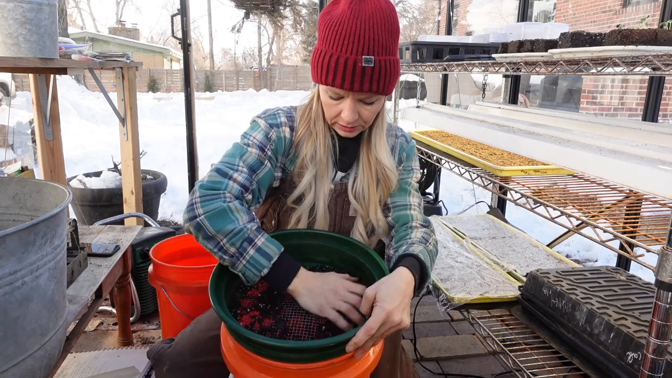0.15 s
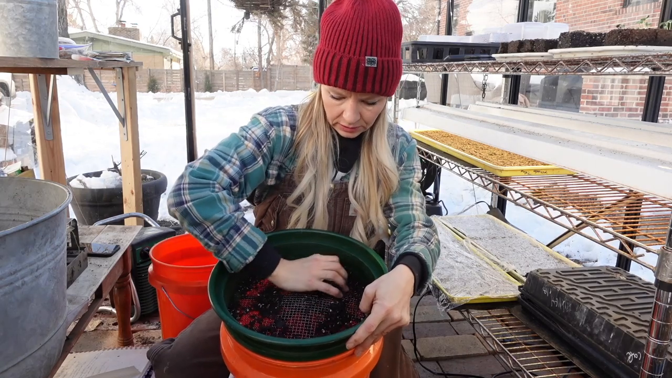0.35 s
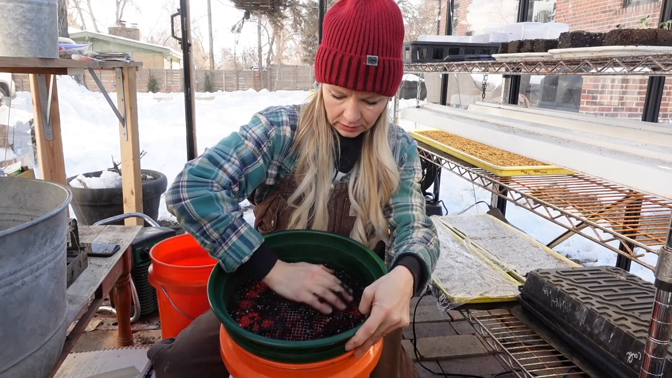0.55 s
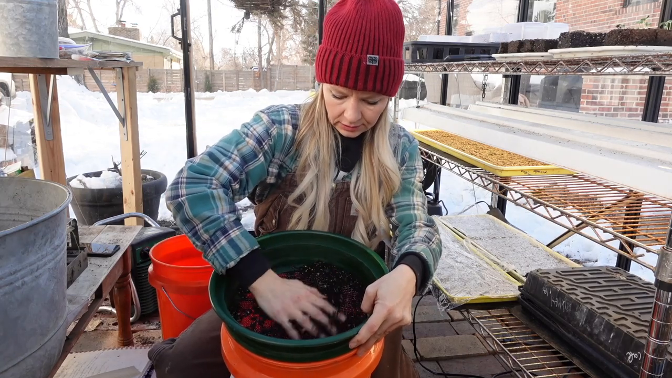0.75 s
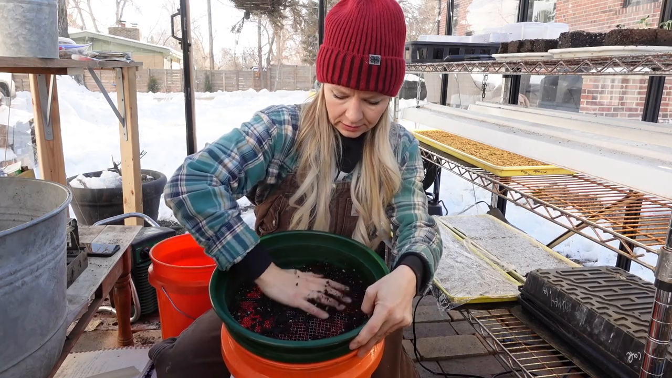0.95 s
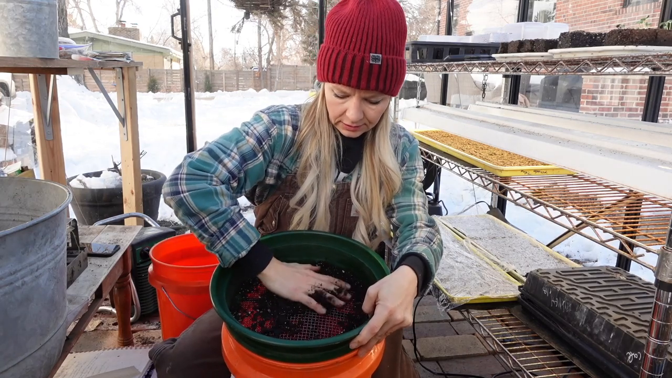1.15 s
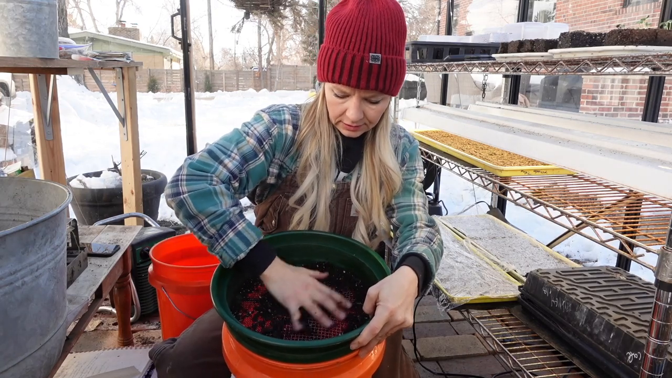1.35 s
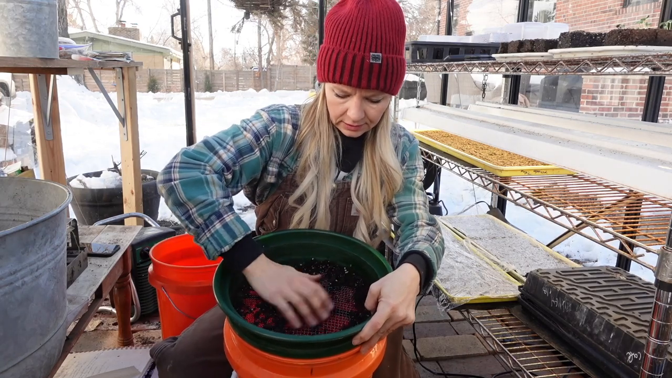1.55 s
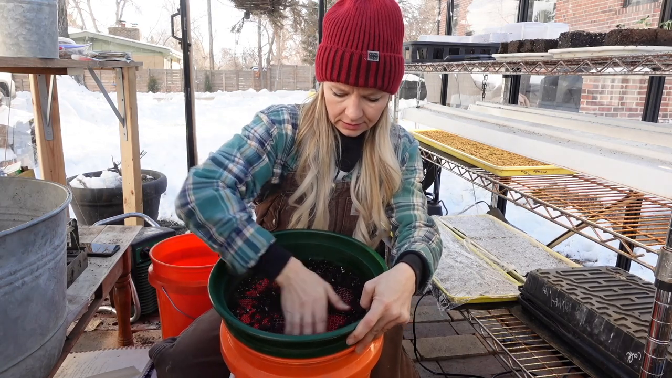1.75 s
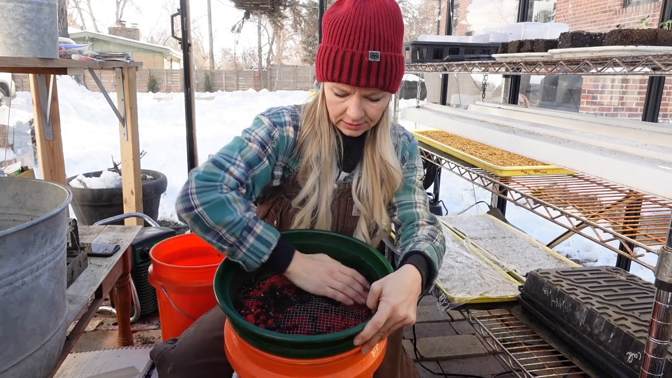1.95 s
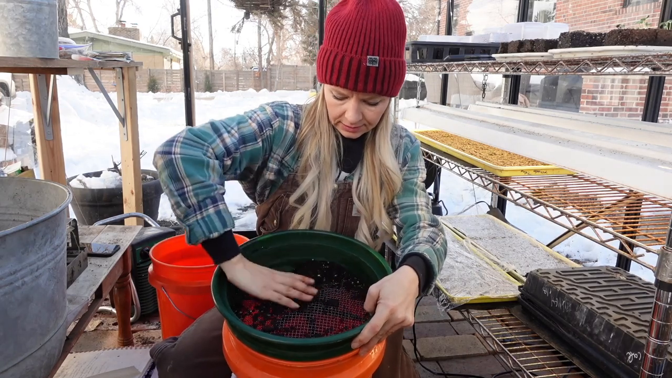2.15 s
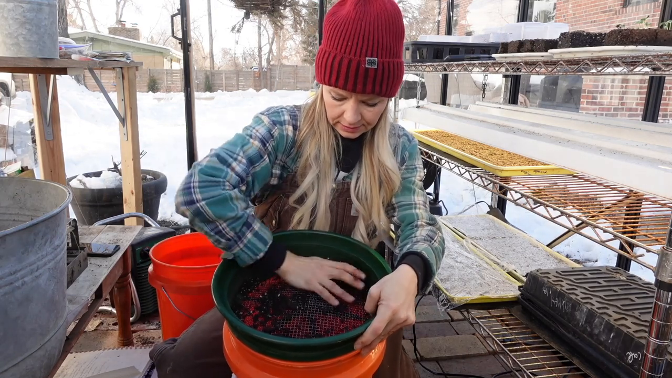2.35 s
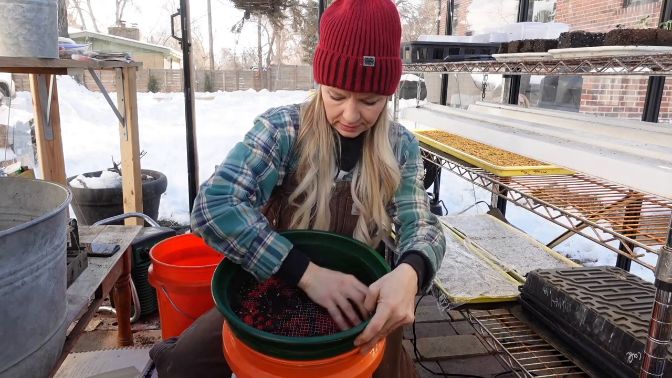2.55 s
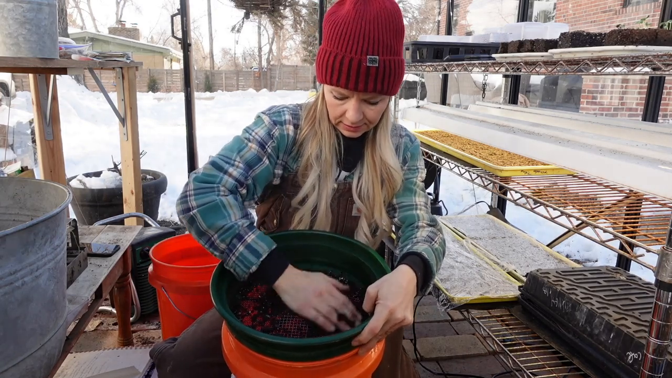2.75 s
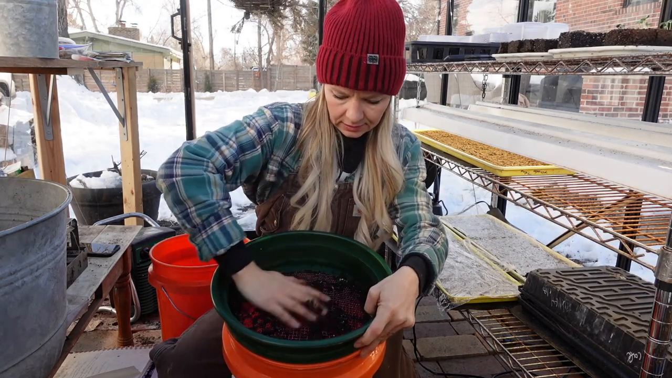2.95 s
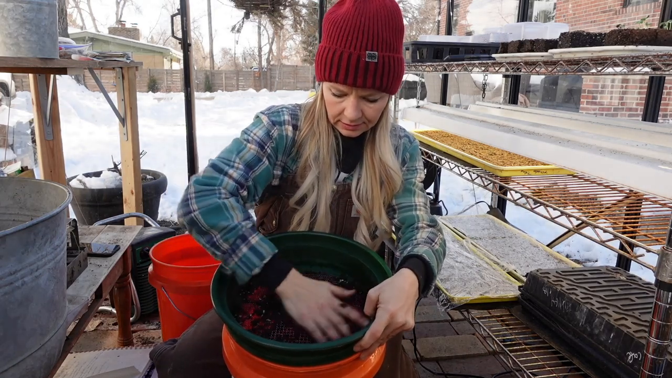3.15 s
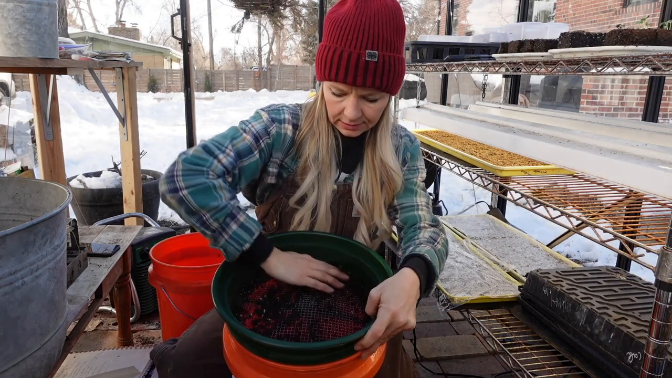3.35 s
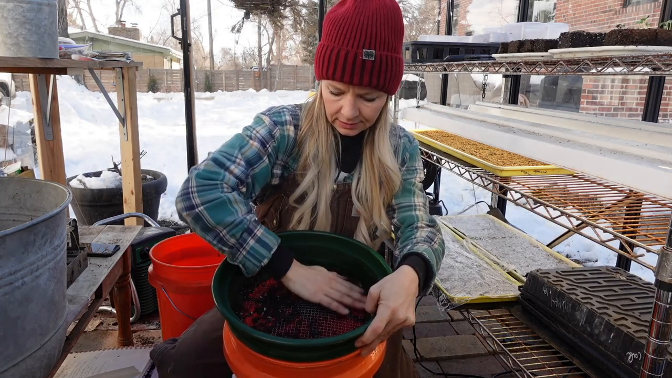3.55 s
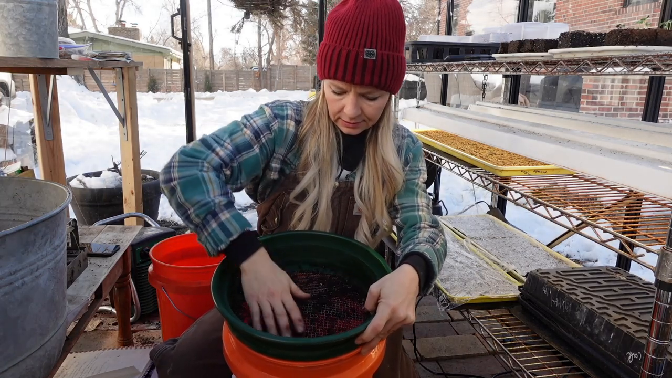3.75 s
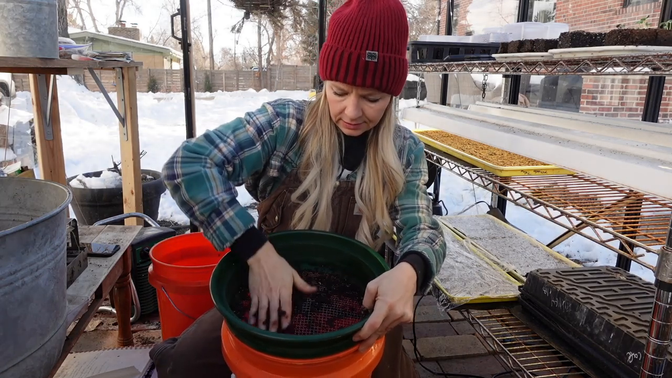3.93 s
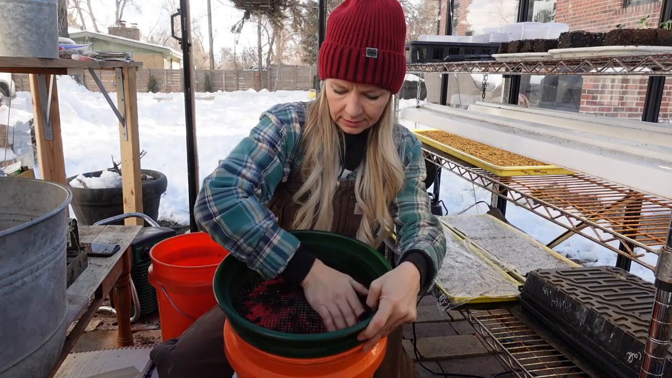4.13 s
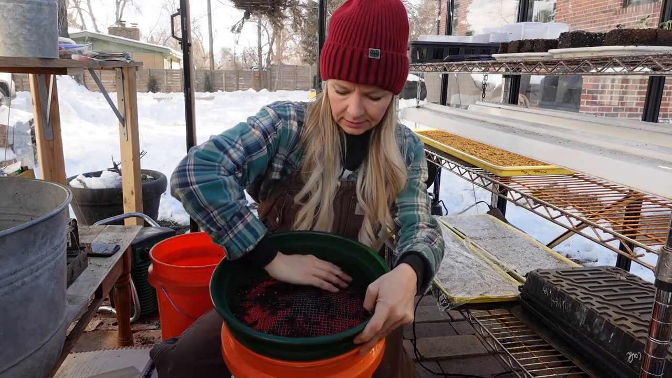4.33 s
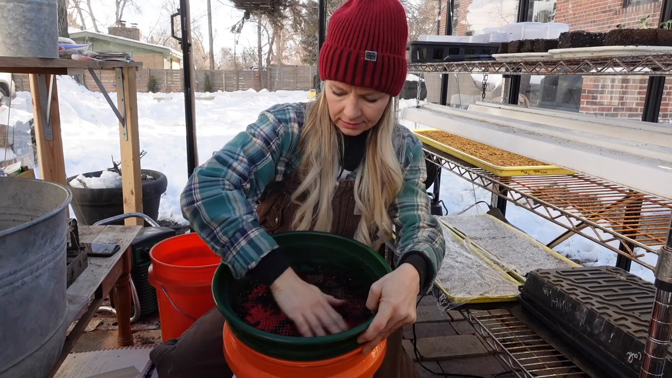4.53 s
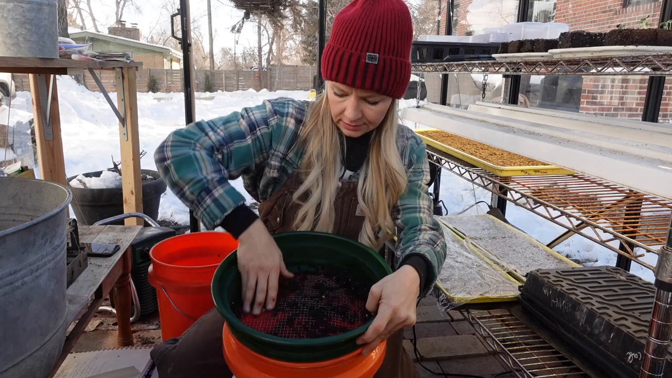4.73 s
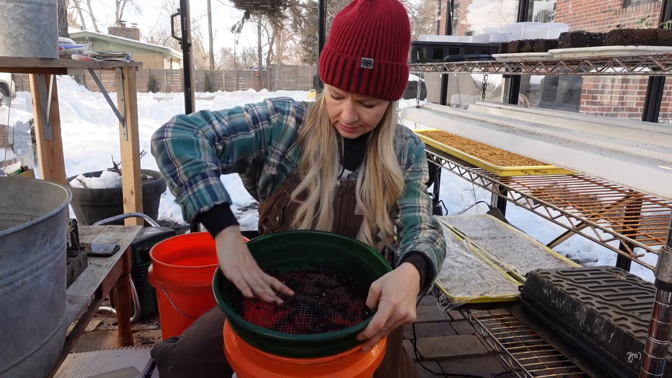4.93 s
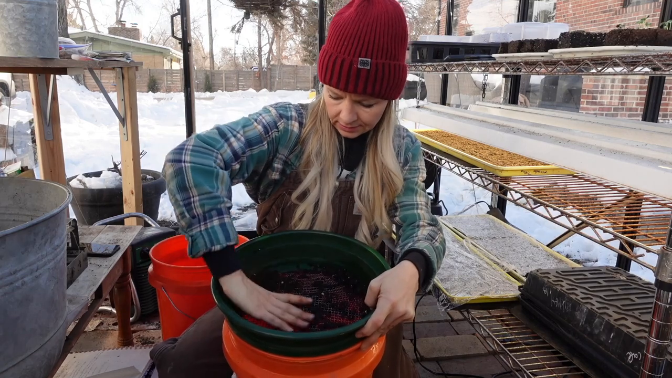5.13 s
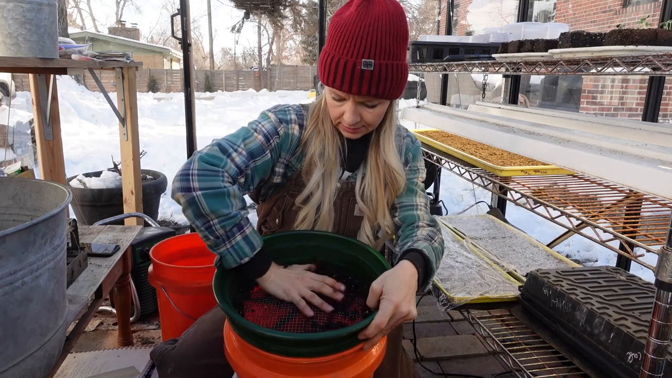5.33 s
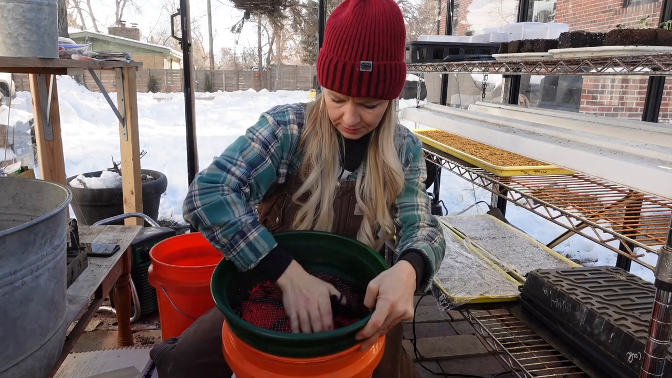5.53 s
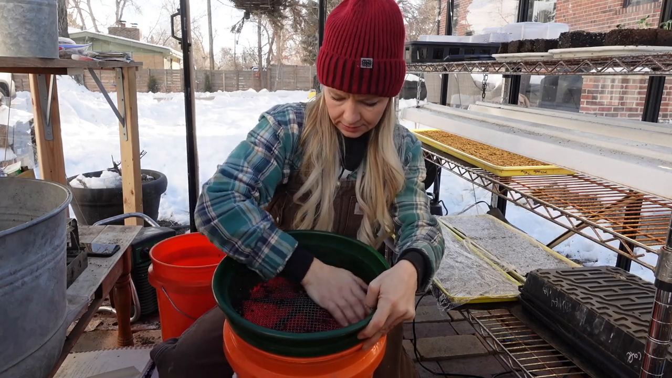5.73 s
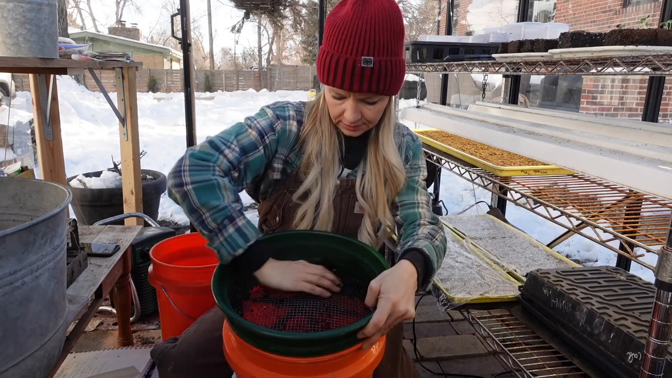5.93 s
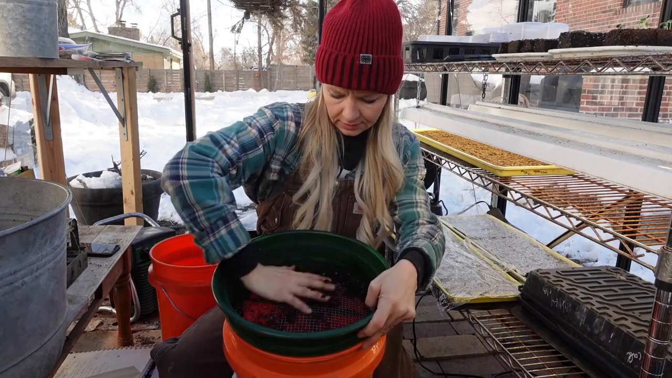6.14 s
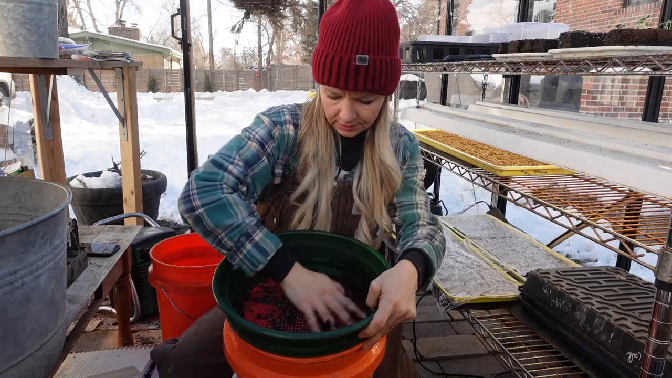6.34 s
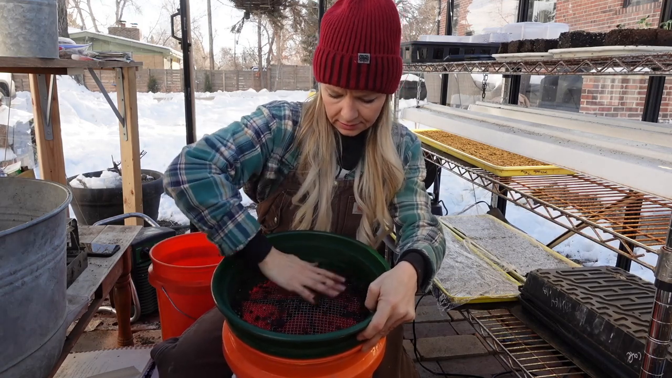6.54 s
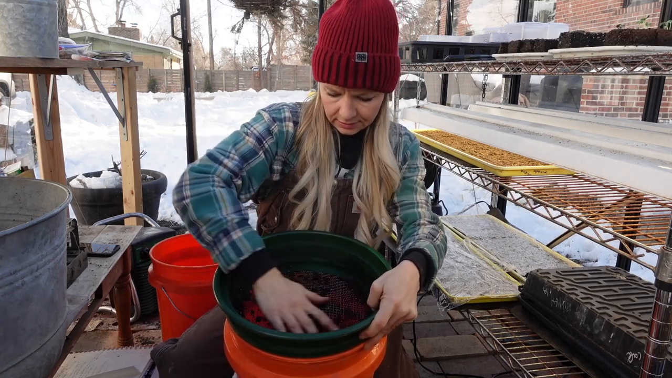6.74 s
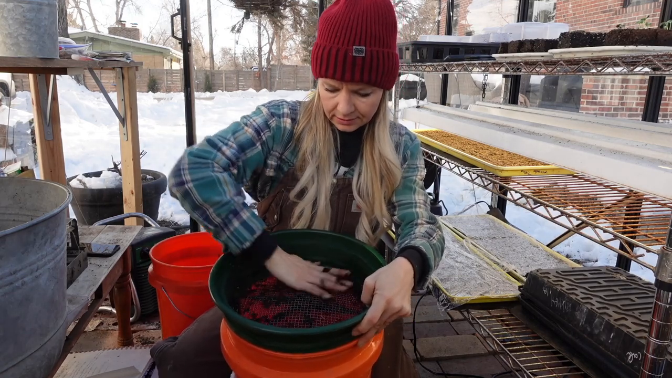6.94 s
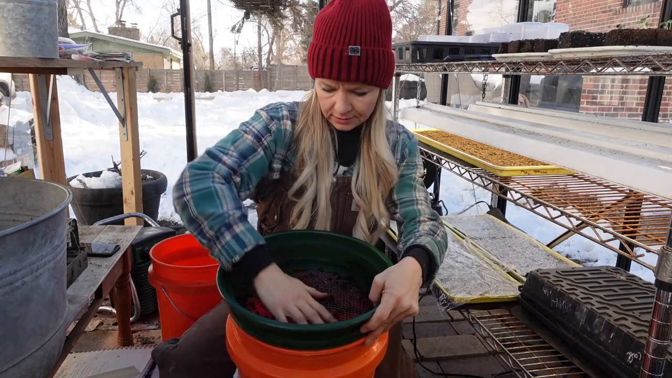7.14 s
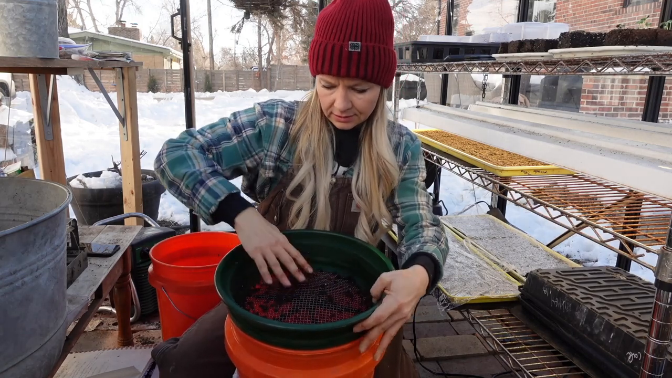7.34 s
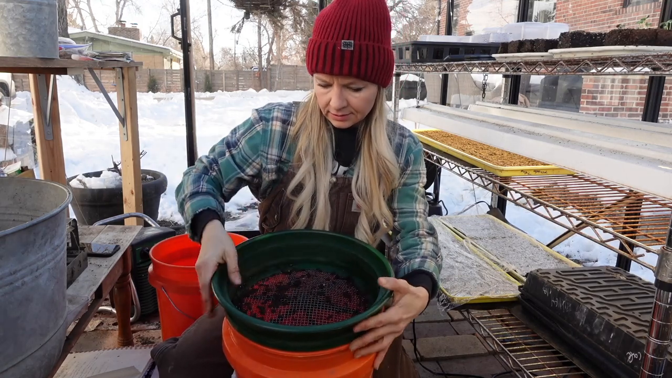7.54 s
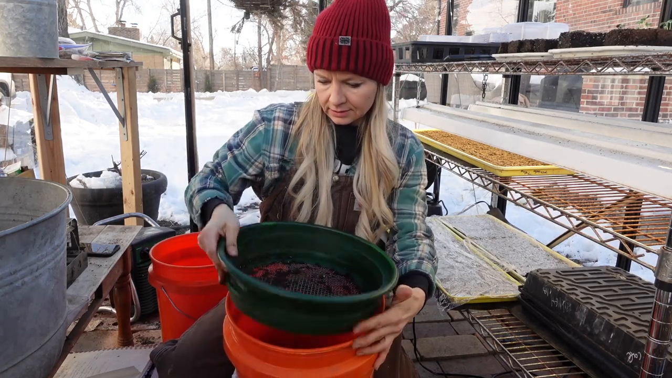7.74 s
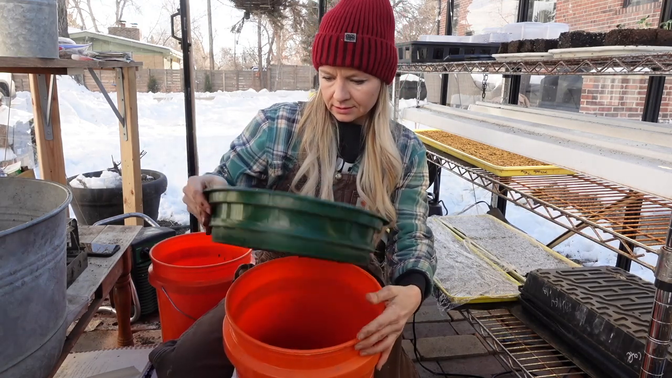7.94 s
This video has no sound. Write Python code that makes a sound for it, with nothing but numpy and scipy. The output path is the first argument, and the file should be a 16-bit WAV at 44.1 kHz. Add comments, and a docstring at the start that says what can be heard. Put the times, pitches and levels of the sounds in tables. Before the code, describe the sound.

A close, dry outdoor sound of potting soil rubbed by hand through a wire-mesh sieve on a plastic bucket. From 0 s, gritty overlapping strokes come about four to seven a second, soft at first and stronger from 0.7 to 1.3 s. Each swells quickly and fades, scratching and ringing the mesh around 1 to 2 kHz, with hissing fine grit above and hollow bucket drumming and wall rattle below. Clods knock irregularly, notably near 0.2, 1.0 and 1.5 s, with tiny snaps. After a dip around 1.5 s the rubbing resumes, busy from 2.5 to 4.8 s, thinner near 5 s amid several knocks, then vigorous from 5.9 to 7.2 s. Strokes die away by 7.4 s, leaving sparse grit and a snap at 7.6 s. At 7.7 s the rim slides with a short rough squeak, followed by faint bumps. Low hum and soft outdoor rumble continue underneath.

```python
"""Gritty, scratching hand strokes: potting soil is rubbed through a wire-mesh sieve on a plastic bucket.
Random grain clicks, swelling with each sweep, scratch and ring the sieve and drum the bucket and its air.
Decaying noise bursts make clods knock and crack; bare clicks snap, and a short friction squeak comes late.
A short diffuse tail surrounds it; below lie a low hum and a faint outdoor rumble, both of filtered noise."""
import sys
import numpy as np
from scipy import signal
from scipy.fft import rfft, irfft
from scipy.io import wavfile

SR = 44100
rng = np.random.default_rng(int(sys.argv[2]) if len(sys.argv) > 2 else 0)


def store_wav(level_fs):
    """Save 16-bit WAV to argv[1]."""
    pcm = np.round(np.clip(np.atleast_2d(level_fs), -1, 1) * 32767)
    wavfile.write(sys.argv[1], SR, pcm.T.astype(np.int16))


N = 356372   # samples


def sifting():
    """Strokes and knocks drive the bucket, the sieve and the fine grit."""
    coarse = grains(6000, spread_db=2.5, clump_db=-0.9, clump_rate=34)
    coarse = coarse * crumbs(80, level_db=-11, t60=0.028)
    return bucket(coarse) + sieve(coarse) + grit()


# Sweeps of the hand over the mesh; levels before each layer's gain:
# start_s, length_s, peak_level_db, air_drumming_db, wall_rattle_db, fine_grit_db (last three re peak)
HAND_SWEEPS = [(-0.052, 0.2, -32.0, -4, -14, -2.5), (0.044, 0.47, -30.5, -12, -11, -2),
               (0.18, 0.44, -34, -11, -10, -1), (0.385, 0.27, -28, -14, -6.5, 1),
               (0.55, 0.23, -29, -7.5, -7.5, -2), (0.686, 0.29, -23.5, -19, -8.5, -1.5),
               (0.845, 0.23, -23.5, -12, -9.5, -2), (0.985, 0.23, -24, -13, -9, -1.5),
               (1.123, 0.16, -18.5, -15, -13, -5.5), (1.227, 0.19, -23.5, -6, -10.0, -3),
               (1.341, 0.24, -27, -5, -9, 0), (1.45, 0.28, -37.5, -22.0, -12, -0.5),
               (1.6, 0.36, -44.5, -8, -11, 0), (1.741, 0.41, -27.5, -9.0, -8, -1.5),
               (1.919, 0.25, -28.5, -4, -3, -1.5), (2.0, 0.42, -30.0, -11, -9.5, -2),
               (2.229, 0.31, -28.5, -14.5, -12, -3), (2.327, 0.67, -30.0, -12, -6, -2.5),
               (2.556, 0.29, -22.5, -10, -10, -7), (2.723, 0.37, -24.0, -10.5, -7.5, -2.5),
               (2.918, 0.36, -21.5, -12, -11.0, -5), (3.108, 0.32, -21, -12, -6.5, -5),
               (3.268, 0.29, -28, -7, -7.0, 0.5), (3.428, 0.54, -29.5, -5.5, -9, 1.5),
               (3.594, 0.5, -23, -14, -8.5, -3.5), (3.923, 0.26, -25.5, -17.5, -10.5, -5.0),
               (4.023, 0.34, -25, -7, -8, -4.0), (4.197, 0.29, -24.5, -6.0, -6.5, 0.5),
               (4.404, 0.42, -23.5, -7.5, -3.5, -2), (4.607, 0.38, -23.0, -14.0, -11, -2.5),
               (4.935, 0.5, -44.5, -1.5, -5.5, 3), (5.172, 0.31, -31, -10, -13.0, 0),
               (5.243, 0.51, -27.5, -9.5, -7.5, -2.0), (5.483, 0.32, -27, -10.5, -6.5, -1.5),
               (5.669, 0.39, -24.5, -9, -8.0, -4.0), (5.787, 0.51, -28.5, -13.0, -6.5, 1),
               (5.955, 0.3, -22.5, -16.0, -8.5, -9), (6.122, 0.39, -25, -14.0, -9.5, -4.0),
               (6.298, 0.3, -19.5, -13.5, -8, -9), (6.453, 0.39, -22.5, -14.5, -9.5, -5.5),
               (6.643, 0.31, -21.5, -11.5, -8.5, -1), (6.797, 0.32, -21, -13.0, -13.5, -8),
               (6.906, 0.27, -23, -15, -5.5, -8.5), (7.058, 0.19, -22.5, -18.0, -7.5, -3),
               (7.114, 0.46, -29.5, -16, -10.0, -4), (7.383, 0.33, -47.5, -16.5, -11.0, 7.5),
               (7.535, 0.39, -47, -3.5, -5.5, 4.5), (7.678, 0.37, -41.5, 5, -4, 0),
               (7.792, 0.19, -38.5, -11, -13, 1), (7.913, 0.14, -51.5, 5, -3.0, 7.5)]
# The hand is fastest early in a sweep; sound power grows steeply with its speed.
SPEED_UP, SPEED_POWER = 0.59, 7.3   # time-warp exponent, power exponent


def sweeps(level_db, trickle_db):
    """Gain of a layer: each sweep speeds up, slows and stops; powers add to a steady trickle."""
    power = np.full(N, from_db(2 * trickle_db))
    for (start_s, length_s, *_), db in zip(HAND_SWEEPS, level_db):
        first = max(round(start_s * SR), 0)
        last = min(round((start_s + length_s) * SR), N)
        i = np.arange(first, last)
        progress = np.clip((i / SR - start_s) / length_s, 0, 1)
        speed = np.sin(np.pi * progress ** SPEED_UP)
        power[i] += from_db(2 * db) * np.abs(speed) ** SPEED_POWER
    return np.sqrt(power)


# Clods and stones; levels before each layer's gain:
# start_s, peak_db, bucket_thump_db, bright_crack_db (both re peak), strongest_hz
CLOD_KNOCKS = [(0.2271, -8, -14, -27, 1710), (0.4464, -23.5, -5, -12, 3310), (0.7338, -15, -4.5, -27, 1770),
               (0.833, -21, -37, 1, 1630), (1.04, -6, -23, -28, 2090), (1.1364, -13, -10, -19, 2230),
               (1.399, -11, -14.5, -30, 1890), (1.49, -2, -27, -30, 2190),
               (1.6334, -22.5, -35, -13.5, 1770), (1.6848, -22.5, -25, -19, 1420),
               (1.739, -23.5, 0.5, -26, 1100), (1.795, -13, -35, -24, 1050), (1.9992, -10, -4.5, -19, 1060),
               (2.071, -16, -29, -16, 2950), (2.598, -11.5, -26, -16, 1060), (2.782, -18, -20, -17, 1400),
               (3.521, -11.5, -33, -17, 1440), (3.5848, -23.5, -24, 2, 3960),
               (3.6778, -10.5, -8, -21, 2580), (3.9583, -8.5, -19, -32, 2650),
               (4.076, -6.5, -19, -29, 1750), (4.4056, -14.5, -13.5, -20, 1700),
               (4.4608, -29, -23, 4, 1350), (4.7018, -21, -21, -14, 1100), (4.9733, -23, 0, -22, 1890),
               (4.9818, -13, -2.5, -34, 1440), (5.019, -20, -22, -19.5, 1870), (5.107, -33, -10, -6, 1720),
               (5.1995, -20, -14, -27, 1600), (5.2368, -10.5, -23, -26, 1800),
               (5.664, -7.5, -35, -40, 2280), (5.721, -13.5, -13, -27, 1710), (5.954, -32, -10, -12, 2090),
               (6.1832, -7.5, -28, -41, 1150), (6.3564, -13, -26, -9.5, 1100),
               (7.0936, -12, -29, -28, 1830), (7.1203, -13.5, -24, -8, 2780), (7.5982, -25, -32, -10, 2310),
               (7.7886, -28, -12, -18, 1950), (7.8676, -21, -26, -25, 1540)]
KNOCK_T60_S = 0.098


def bursts(level_db, focus_db):
    """Each knock starts at once and crumbles away as noise, with a focus band where the mesh was struck."""
    out, t = np.zeros(N + SR), np.arange(SR // 4) / SR
    for (start_s, *_, hz), db in zip(CLOD_KNOCKS, level_db):
        burst = from_db(db - 60 * t / KNOCK_T60_S) * rng.standard_normal(len(t))
        focus = from_db(focus_db) * resonate(burst, hz, 0.76 * hz)
        out[round(start_s * SR):][:len(t)] += burst + focus
    return out[:N]


# Soil that keeps dropping through between sweeps, before each layer's gain [dB]
TRICKLE_DB, TRICKLE_GRIT_DB, TRICKLE_BUCKET_DB = -52, -53.5, -59

# Ringing of the mesh and rim: mode_hz, width_hz, level_db
SIEVE_MODES = [(770, 78, -28), (940, 110, -9), (1093, 64, 8.5), (1123, 17, 12.5), (1413, 20, 11),
               (1400, 43.6, 13.5), (1600, 30, -32), (1673, 119, 13), (1814, 110, -11.5), (2048, 88, 10),
               (2690, 580, -12), (2905, 31, 8), (3310, 300, -10)]
# Scratch of grains on the wires, spectrum before gain: frequency_hz, density_db (per Hz)
WIRE_SCRATCH = [(400, -9), (800, 0.5), (1600, 5.5), (3000, -2.5), (4500, -4.5)]


def sieve(coarse):
    """Rubbed grains and knocks ring the mesh modes and scratch the wires directly."""
    stroke_db, peak_db = np.transpose(HAND_SWEEPS)[2], np.transpose(CLOD_KNOCKS)[1]
    rubbed = from_db(5.5) * sweeps(stroke_db, TRICKLE_DB) * coarse
    rubbed = patchy(rubbed, [1300, 2400], depth_db=2.53, rate=12.0)
    on_mesh = rubbed + bursts(peak_db - 19, focus_db=14)
    ring = body(on_mesh, SIEVE_MODES, wander_db=1.4)
    scratch = colour(on_mesh, [(150, -42.0)] + WIRE_SCRATCH + [(9000, -15.5)])
    return ring + from_db(2.0) * scratch


# Fine-grit spectrum: frequency_hz, density_db (per Hz)
GRIT_COLOUR = [(1760, -23.5), (3000, 1.5), (4440, -4.5), (5710, 1), (8050, 0.5), (14400, -7.5), (16000, -3)]


def grit():
    """Dense fine grains hiss with the sweeps, and knocks add bright cracks."""
    stroke_db, grit_db = np.transpose(HAND_SWEEPS)[[2, 5]]
    peak_db, crack_db = np.transpose(CLOD_KNOCKS)[[1, 3]]
    fine = grains(9000, spread_db=3.4, clump_db=0.6, clump_rate=23)
    fine = fine * crumbs(40, level_db=-6, t60=0.035)
    swept = from_db(5) * sweeps(stroke_db + grit_db, TRICKLE_GRIT_DB) * fine
    swept = patchy(swept, [4000, 7000, 11000], depth_db=1.1, rate=22)
    cracks = bursts(peak_db + crack_db + 10, focus_db=-30)
    return colour(swept + cracks, GRIT_COLOUR)


# Modes of the air in the bucket: mode_hz, width_hz, level_db
AIR_MODES = [(167.3, 34.7, 4), (215, 50, 0), (262, 62, -14)]
# Modes of the plastic walls: mode_hz, width_hz, level_db
WALL_MODES = [(244, 39, -5), (307, 27, 1.5), (365, 29, -4.5), (442, 42, -5.5), (496.6, 9.7, 2.5),
              (495, 67, -4), (627, 26, -8)]


def bucket(coarse):
    """Lumps and thumps drum the air; coarse grains and weaker thumps rattle the walls."""
    stroke_db, drum_db, wall_db = np.transpose(HAND_SWEEPS)[2:5]
    peak_db, thump_db = np.transpose(CLOD_KNOCKS)[1:3]
    lumps = grains(1500, spread_db=2.5, clump_db=-2.7, clump_rate=16)
    thumps = bursts(peak_db + thump_db + 19.5, focus_db=-30)
    drumming = from_db(25.0) * sweeps(stroke_db + drum_db, TRICKLE_BUCKET_DB) * lumps
    rattle = from_db(22.0) * sweeps(stroke_db + wall_db, TRICKLE_BUCKET_DB) * coarse
    air = body(drumming + thumps, AIR_MODES, wander_db=1.5)
    walls = body(rattle + from_db(-5) * thumps, WALL_MODES, wander_db=2.0)
    # too small to radiate below its first mode
    return signal.sosfilt(signal.cheby2(8, 40, 135, "high", fs=SR, output="sos"), air + walls)


# Dry twigs and pebbles snap on the wires, before gain and filter: start_s, peak_db
WIRE_SNAPS = [(0.2264, -13), (0.833, -7), (1.491, -10), (1.6317, -23), (3.5823, -8), (3.5854, -9),
              (4.9816, -23), (5.6645, -13), (7.1174, -6), (7.5978, -9), (7.7862, -27)]


def snaps():
    """Bare clicks, band-passed so that they carry no bass."""
    start_s, peak_db = np.transpose(WIRE_SNAPS)
    clicks = np.zeros(N)
    clicks[np.round(start_s * SR).astype(int)] = -from_db(peak_db + 4)
    return signal.sosfilt(signal.butter(2, [1400, 12000], "band", fs=SR, output="sos"), clicks)


# The rim slides off the bucket: time_s, level_db
RIM_SLIDE = [(7.69, -64), (7.704, -40), (7.732, -32), (7.744, -28), (7.79, -52)]
# Tones of the rubbing plastic: tone_hz, width_hz, level_db
RIM_TONES = [(1510, 41, -13), (1854, 36, 3), (2230, 21, -8), (2960, 40, -11)]


def squeak():
    """Plastic rubs on plastic: rough friction through a few narrow tones."""
    fade_in, fade_out = (RIM_SLIDE[0][0] - 0.02, -90), (RIM_SLIDE[-1][0] + 0.02, -90)
    time_s, level_db = np.transpose([fade_in] + RIM_SLIDE + [fade_out])
    level_db = np.interp(np.arange(N) / SR, time_s, level_db)
    friction = grains(900, spread_db=1.5, clump_db=-1.0, clump_rate=50)
    return from_db(level_db) * rms_one(body(friction, RIM_TONES, wander_db=0.5))


def shelter(x, t60):
    """Shelves and posts scatter the sound into a short diffuse tail; energy 1."""
    t = np.arange(SR // 4) / SR
    tail = rng.standard_normal(len(t)) * from_db(-60 * t / t60) * (t > 0.002)
    return signal.oaconvolve(x, tail / np.sqrt(np.sum(tail ** 2)))[:N]


# Left-right difference spectrum, steeply cut above 3.5 kHz, before any further gain:
# frequency_hz, level_db (re centre)
SIDE_COLOUR = [(100, -29), (250, -26.5), (500, -21), (1000, -16), (2000, -27.5), (3500, -28.5), (5000, -60),
               (16000, -41)]


def left_right(x):
    """Stereo difference: the coloured sound enters the two channels with opposite signs."""
    return colour(x, SIDE_COLOUR) * [[1], [-1]]


# Outdoor rumble spectrum, before scaling to rms 1: frequency_hz, density_db (per Hz)
RUMBLE_COLOUR = [(25, -12), (50, -29), (100, -1), (140, -6), (300, -7.5), (1000, -21.5), (2000, -14.5),
                 (6000, -35), (16000, -29)]
RUMBLE_DB = -49.5   # rms in the dry mix
HUM_HZ, HUM_WIDTH_HZ, HUM_DB = 66.8, 8.3, -54.5   # width of the narrower resonance; rms in the dry mix


def outdoors():
    """A wavering low hum over a broad rumble, whose bass is a little unlike in the two channels."""
    rumble, side_rumble = [rms_one(colour(rng.standard_normal(N), [(3.7, -35)] + RUMBLE_COLOUR))
                           for _ in range(2)]
    hum = resonate(rng.standard_normal(N), HUM_HZ, HUM_WIDTH_HZ)
    hum = rms_one(resonate(hum, HUM_HZ, 27))
    centre = from_db(RUMBLE_DB) * rumble + from_db(HUM_DB) * hum
    return centre + from_db(RUMBLE_DB + 20) * left_right(side_rumble)


def grains(per_s, spread_db, clump_db, clump_rate):
    """Random clicks of uneven size that come in clumps; rms 1."""
    sizes = from_db(spread_db * np.minimum(rng.exponential(1, N), 5)) * rng.choice([-1, 1], N)
    hits = rng.random(N) < per_s / SR
    return rms_one(sizes * hits * from_db(clump_db * drift(clump_rate)))


def crumbs(per_s, level_db, t60):
    """Crumbs that give way: the gain jumps at random moments and sinks back to 1."""
    sizes = from_db(level_db) * np.minimum(rng.exponential(1, N), 2)
    jumps = (rng.random(N) < per_s / SR) * sizes
    return 1 + signal.lfilter([1], [1, -from_db(-60 / (t60 * SR))], jumps + 1e-18)


def patchy(x, edges_hz, depth_db, rate):
    """The bands between the edges swell and sink at random, each on its own."""
    lows = [signal.sosfilt(signal.butter(1, hz, fs=SR, output="sos"), x) for hz in edges_hz]
    lows = [0 * x] + lows + [x]
    return sum(from_db(depth_db * drift(rate)) * (high - low) for low, high in zip(lows, lows[1:]))


def body(x, modes, wander_db):
    """Modes in parallel, signs alternating; each mode's level drifts slowly at random, on its own."""
    out = 0
    for k, (hz, width_hz, db) in enumerate(modes):
        gain = from_db(db + wander_db * drift(4.0))
        out = out + (-1) ** k * gain * resonate(x, hz, width_hz)
    return out


def resonate(x, hz, width_hz):
    """One two-pole resonance with gain 1 on top."""
    r = np.exp(-np.pi * width_hz / SR)
    top = (1 - r * r) / 2
    return signal.lfilter([top, 0, -top], [1, -2 * r * np.cos(2 * np.pi * hz / SR), r * r], x + 1e-18)


def colour(x, points):
    """Minimum-phase filter that follows a (frequency_hz, level_db) table on a log axis."""
    size = 4096
    hz = np.maximum(np.arange(size // 2 + 1) * SR / size, 1)
    table_hz, table_db = np.transpose(points)
    log_gain = np.interp(np.log(hz), np.log(table_hz), table_db) * np.log(10) / 20
    cepstrum = irfft(log_gain)
    cepstrum[1:size // 2] *= 2   # folding the cepstrum gives minimum phase
    cepstrum[size // 2 + 1:] = 0
    return signal.oaconvolve(x, irfft(np.exp(rfft(cepstrum))))[:N]


def drift(rate):
    """Slow chance: noise twice through a one-pole low-pass at rate [Hz]; rms 1."""
    step = 40   # samples between slow values
    r = np.exp(-2 * np.pi * rate * step / SR)
    noise = rng.standard_normal(N // step + 2002)
    slow = signal.lfilter([1], [1, -2 * r, r * r], noise)[2000:]   # skip the filter's start
    return np.interp(np.arange(N) / step, np.arange(len(slow)), rms_one(slow))


def from_db(db):
    """Decibels to amplitude."""
    return 10 ** (np.asarray(db) / 20)


def rms_one(x):
    """Scale to rms 1."""
    return x / np.sqrt(np.mean(x ** 2) + 1e-20)


def scene():
    """Sifting, snaps and squeak up close, their diffuse tail around them, outdoors behind."""
    near = sifting() + snaps() + squeak()
    centre = near + from_db(-17) * shelter(near, t60=0.12)
    return centre + left_right(shelter(near, t60=0.17)) + outdoors()


def record(dry):
    """Peaks are rounded, the top is cut steeply."""
    rounded = 0.76 * np.tanh(dry / 0.85)
    top_cut = signal.cheby2(16, 80, 16150, fs=SR, output="sos")   # 80 dB down from 16150 Hz
    return signal.sosfilt(top_cut, rounded)


dry = scene()
out = record(dry)
store_wav(out)
```